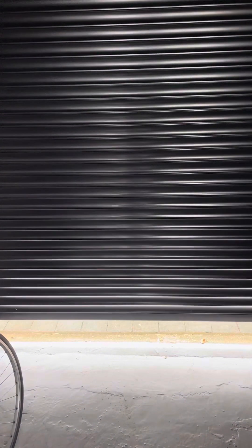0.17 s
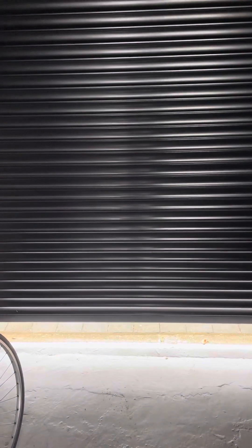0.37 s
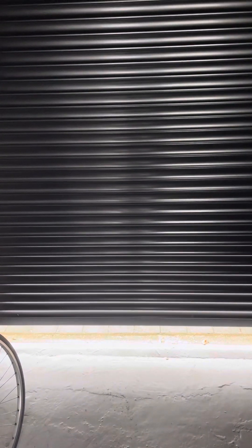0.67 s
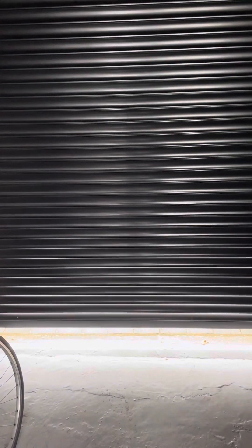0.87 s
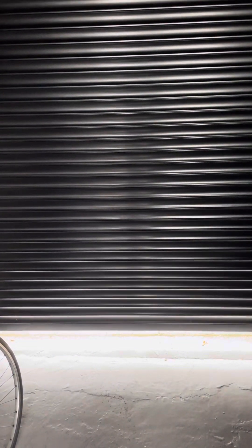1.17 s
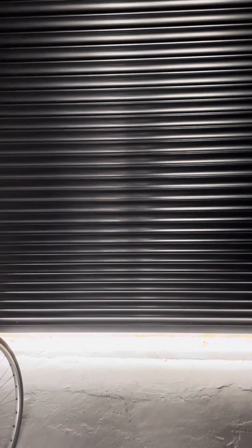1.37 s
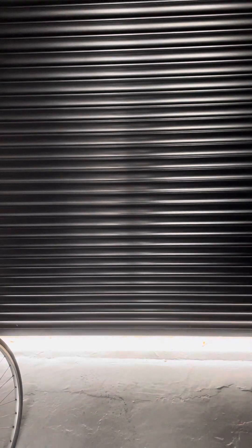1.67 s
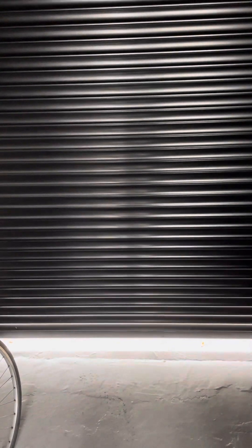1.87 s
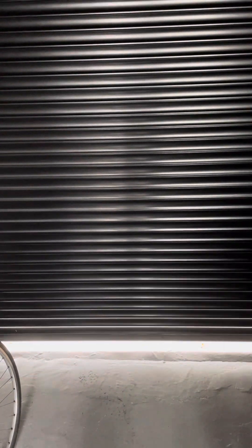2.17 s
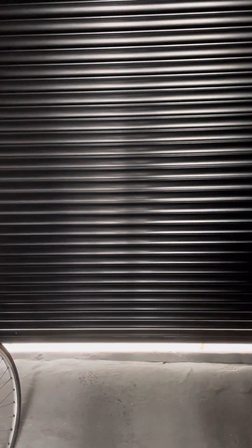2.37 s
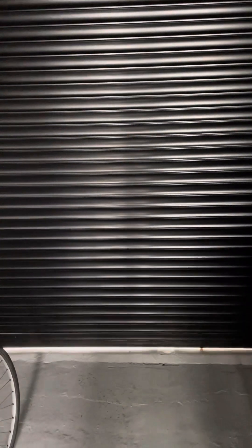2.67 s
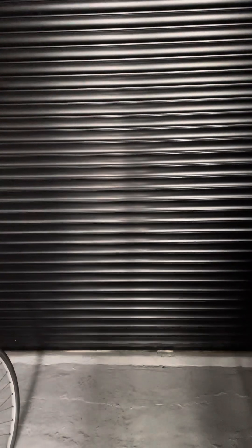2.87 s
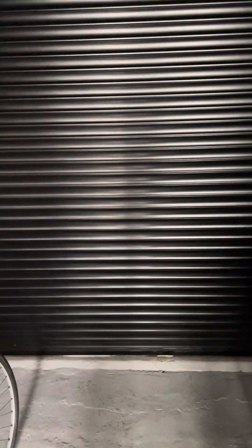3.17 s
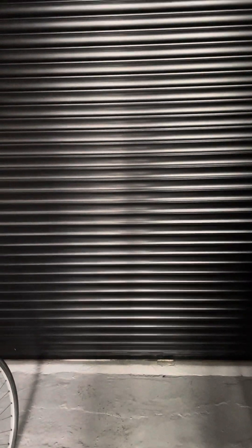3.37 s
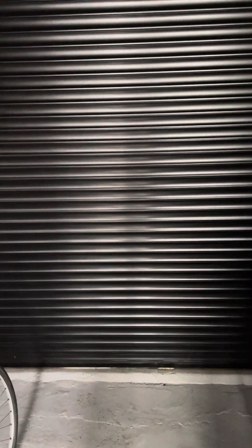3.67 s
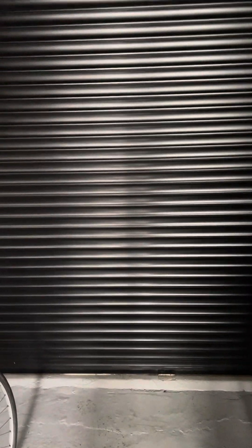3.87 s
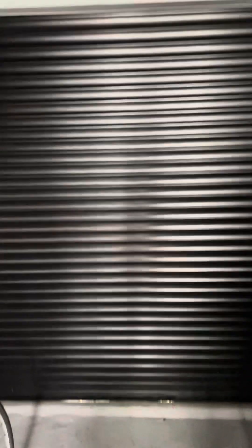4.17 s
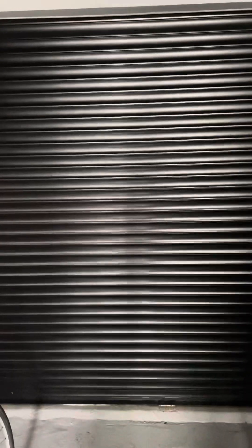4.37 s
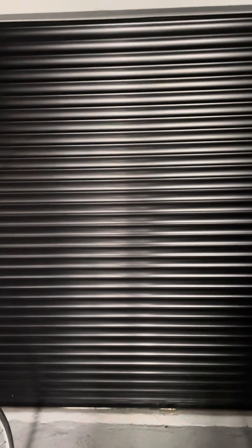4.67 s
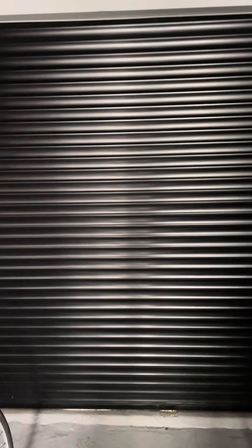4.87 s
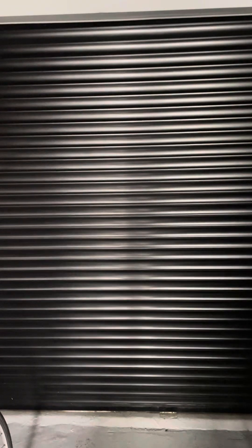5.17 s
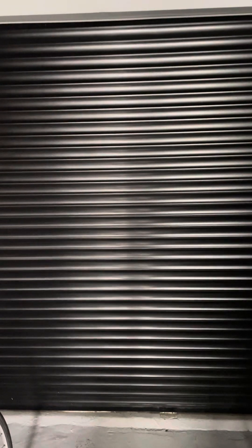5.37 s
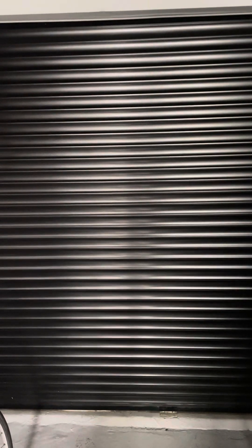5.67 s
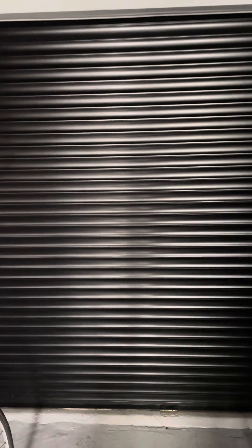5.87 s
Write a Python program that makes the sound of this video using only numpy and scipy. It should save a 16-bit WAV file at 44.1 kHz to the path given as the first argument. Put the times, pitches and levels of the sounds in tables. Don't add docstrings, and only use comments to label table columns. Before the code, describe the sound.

A motorised metal roller door closes in a bare concrete garage, heard a few steps away through a phone's stereo microphones. From 0 s the motor is already humming, a low mains drone with a mid-pitched gear whine, over the rumbling, rattling and hissing rub of the curtain. A strong jerk booms at about 0.7 s; a softer, longer boom comes at 1.5 s, with a sharp slat clack at 1.7. Clacks gather from 2.8 s, with fine hinge ticks, another jolt at 3.4 and loud clacks around 3.9 as the bottom lands. The gears slow slightly and their strained hum swells from 4 s, with fewer clacks. Near 5 s the curtain is pressed home with a deep hum surge, a clack and a tiny hoarse squeak. Slats clatter at 5.4, then at 5.66 the brake snaps with a hollow clunk; the sheet sways low and hum and short echo die away.

```python
import sys
import numpy as np
from scipy import signal
from scipy.fft import rfft, irfft, next_fast_len
from scipy.io import wavfile
from scipy.ndimage import uniform_filter1d

SR = 44100
rng = np.random.default_rng(int(sys.argv[2]) if len(sys.argv) > 2 else 0)


def boost(x):
    u = np.asarray(x, float) / 20
    return 10 ** u


def file_out(sig):
    cols = np.atleast_2d(sig).T
    lim = np.clip(cols, -1, 1)
    pcm = np.round(lim * 32767).astype(np.int16)
    wavfile.write(sys.argv[1], SR, pcm)


N = 265041
T = np.arange(N) / SR
BRAKE_S = 5.66


def curtain():
    # (time [s], shake level [dB], rubbing level [dB])
    travel = [(0, -52.5, -53), (.12, -48.5, -52), (.5, -48.5, -50), (1.2, -48.5, -52), (1.6, -46, -48.5),
              (2.2, -47.5, -52.5), (2.75, -44.5, -47.5), (3.1, -49.5, -51), (3.48, -44.5, -48.5),
              (3.9, -47, -53.5), (4.5, -52, -56), (4.88, -49, -55.5), (4.96, -44.5, -44), (5.12, -41, -46),
              (5.28, -53.5, -60), (5.45, -45, -49.5), (5.53, -52, -59), (5.65, -51, -54.5)]
    # (start [s], length [s], level [dB])
    jolts = [
        (.08, .09, -46.5),
        (.25, 0.2, -49),
        (.58, 0.075, -47.5),
        (.72, 0.14, -38),
        (1.5, 0.38, -48),
        (3.42, 0.19, -40),
        (4.0, .08, -46),
        (4.88, 0.21, -44),
        (5.65, 0.1, -39.5),
    ]
    # (frequency [Hz], width [Hz], level [dB])
    panel_modes = [(230.6, 10.5, -3), (268.8, 18, 0), (327.5, 20, 5), (363.6, 15, 6), (403.5, 14, -2.5),
                   (524.4, 23.4, -3.5), (588, 45, -2), (775, 47, 3.5), (816, 24, 0.5), (917, 60, -1.5),
                   (1059, 27.7, -2.5), (1176, 27, -6.5)]
    # (frequency [Hz], level [dB])
    thud_colour = [(25, -34), (45, -8), (72, -5), (90, -6), (140, -12), (170, -13.5)]
    rumble_colour = [(120, -35.5), (165, -4.5), (230, -0.5), (330, -5), (400, -5), (450, -4), (520, -3.5),
                     (620, -21), (750, -24)]
    rattle_colour = [(520, -21), (650, -1.5), (780, -4.5), (1050, -1), (1180, -7), (1450, -8.5),
                     (1900, -24.5)]
    rub_colour = [(1200, -13.5), (1600, -3.5), (2400, -2), (3300, -6.5), (4500, -9.5), (5100, -5.5),
                  (6300, -2.5), (8500, -5), (10000, -13.5), (12500, -5), (16000, -20.5)]
    rumble_db, thud_db, settle_db = -42, -55, -45
    quiet_db = -21.5
    settle_rise_s = 0.065

    shake_db, rub_db = columns(travel)
    swing_db = shake_db - np.mean(shake_db)
    boom_db = swells(jolts, rumble_db, 1.55)
    low = boost(stopped(0.85)) + boost(quiet_db)
    high = boost(stopped(0.47)) + boost(-39.5)

    push = unit(grains(3000, 0.34))
    modes = sum(boost(db) * ring(push, hz, width) for hz, width, db in panel_modes)
    sheet = push + boost(-9.5) * unit(modes)
    rumble_level = boost(boom_db + 0.6 * swing_db + 3.5 + 0.81 * walk(11))
    rumble = rumble_level * unit(colour(sheet, rumble_colour))
    rattle = boost(shake_db + 2.5 + 1.2 * walk(10)) * unit(colour(sheet, rattle_colour))
    rub = boost(rub_db + 4.5 + 1.36 * walk(8.2)) * unit(colour(grains(9000, 0.4), rub_colour))

    after = np.clip(T - BRAKE_S, 0, None) / settle_rise_s
    sway = boost(thud_db + 0.58 * (boom_db - rumble_db) + 0.42 * swing_db + 5.0)
    sway = sway + boost(settle_db) * after * np.exp(1 - after)
    thud = sway * unit(colour(push, thud_colour))
    return low * rumble + (low - 0.66 * boost(quiet_db)) * rattle + high * rub + thud


def grains(rate, scatter_db):
    hit = rng.random((2, N)) < rate / SR
    return hit * rng.standard_normal((2, N)) * boost(scatter_db * rng.exponential(size=(2, N)))


def clacks():
    # (time [s], peak level [dB], ring [Hz], low knock [dB], crack [dB])
    slat_hits = [(0.174, -40, 2230, -12, -11), (0.7804, -34, 2100, 12.5, -21),
                 (1.7125, -23.5, 1980, -3, -20), (2.2498, -40, 1970, 21, -13),
                 (2.8407, -22.5, 2080, 6.5, -23), (2.9173, -32.5, 2250, 19, -13),
                 (2.9905, -39.5, 2170, -5, -10), (3.085, -34.5, 2330, 8.5, -11.5),
                 (3.27, -39, 2350, 20, -19), (3.3579, -29.5, 2000, 2.5, -19), (3.4894, -40, 2170, 21, -22),
                 (3.7549, -28.5, 2280, 6.5, -14.5), (3.837, -37.5, 2320, 3, -21),
                 (3.8798, -24, 2200, 2, -17), (3.926, -21, 2210, -8, -21.5), (4.0405, -39, 2090, 18.5, -20),
                 (4.5228, -37.5, 1780, 13.5, -30), (4.9028, -37.5, 2320, 12.5, -14),
                 (5.03, -26, 2100, 8, -18), (5.35, -38.5, 2980, -9, -13), (5.4047, -29, 1870, -7, -26),
                 (5.4188, -25, 1980, -17.5, -23), (5.4373, -23.5, 1810, 1, -13.5)]
    # (time [s], peak level [dB])
    hinge_ticks = [
        (1.721, -71.5),
        (2.646, -79),
        (2.737, -49.5),
        (2.85, -52.5),
        (2.983, -53.5),
        (3.4514, -66),
        (3.508, -48),
        (3.592, -52),
        (4.4897, -72),
        (5.4331, -62.5),
    ]
    out, t = np.zeros(N), T[:SR // 5]
    for s, db, hz, knock_db, crack_db in slat_hits:
        chatter = rng.standard_normal(len(t)) * np.exp(-t / 0.02)
        slat = boost(6) * ring(chatter, hz, 550) + boost(crack_db + 12) * crack(chatter)
        knock = boost(knock_db - 0.5) * ring(chatter, 540, 700)
        lower_ring = boost(1.5) * ring(chatter, 0.61 * hz, 400)
        add(out, s, boost(db - 7.5) * (slat + knock + lower_ring))
    for s, db in hinge_ticks:
        tick = rng.standard_normal(len(t)) * np.exp(-t / 0.0025)
        add(out, s, boost(db + 26.0) * (ring(tick, 10000, 6400) + boost(-6) * ring(tick, 13500, 2500)))
    return out


def crack(x):
    return ring(ring(ring(x, 4800, 5400), 4000, 7800), 4200, 8000)


def brake():
    # (frequency [Hz], width [Hz], level [dB])
    housing = [(270, 130, -16), (676, 140, -9), (870, 100, -6.5), (1170, 62, -8), (1480, 1100, -7),
               (2530, 160, -6.5), (3400, 270, -23), (4840, 650, -12), (6500, 440, -20)]
    snap_db, clunk_db = -27.5, -27.5
    clunk_hz, clunk_rise_s = 366, 0.011
    t = T[:SR // 3]
    slap = rng.standard_normal(len(t)) * np.clip(t / 0.0063, 0, 1) * np.exp(-(t / 0.028) ** 2)
    snap = sum(boost(db) * ring(slap, hz, width) * np.sqrt(1000 / width) for hz, width, db in housing)
    swell = t / clunk_rise_s * np.exp(1 - t / clunk_rise_s)
    clunk = boost(clunk_db) * swell * np.sin(2 * np.pi * clunk_hz * t)
    return add(np.zeros(N), BRAKE_S, boost(snap_db + 2.5) * (snap + boost(-26) * crack(slap)) + clunk)


def squeak():
    centre_s, length_s, level_db = 5.02, 0.03, -49
    hoarse = unit(ring(rng.standard_normal(N), 2985, 90))
    return boost(level_db) * hoarse * np.exp(-((T - centre_s) / length_s) ** 2)


def motor():
    # (start [s], length [s], level [dB])
    tuned_100 = [(-.05, .8, -40), (1.1, 0.94, -41), (1.85, 0.43, -47.5), (2.2, 0.77, -37.5),
                 (2.85, 1.05, -41), (3.98, 0.36, -38.5), (4.45, 0.89, -35.5), (4.96, 0.26, -27.5),
                 (5.23, 0.32, -28.5), (5.5, .15, -44.5), (5.66, 0.22, -45)]
    tuned_200 = [
        (.05, 0.57, -48.5),
        (2.5, 0.23, -41),
        (3.97, 0.46, -36),
        (4.4, 0.71, -35.5),
        (4.85, .2, -33),
        (5.1, .33, -36.5),
        (5.48, 0.24, -38),
    ]
    tuned_300 = [
        (-.2, 2.04, -39),
        (1.9, 0.78, -42),
        (2.85, 1.07, -40),
        (3.97, 1.167, -35),
        (4.98, .17, -39),
        (5.45, .27, -37),
    ]
    tuned_mesh = [
        (-.1, .92, -40),
        (1.0, 1.0, -46.5),
        (2.85, .6, -45),
        (3.4, 0.99, -39.5),
        (4.3, 0.71, -46.5),
        (5.03, .2, -37),
        (5.24, 0.2, -37),
        (5.5, 0.15, -43.5),
    ]
    tuned_fifth = [
        (1.3, 0.38, -44),
        (2.05, 0.28, -47.5),
        (3.95, 0.62, -48.5),
        (4.85, 0.44, -39.5),
    ]
    tuned_panel = [(.05, 0.53, -47), (1.52, 0.42, -41),
                                                               (2.45, 0.5, -45), (3.5, .4, -42.5),
                                                               (4.3, 0.94, -51)]
    off_tune = [-54.5, -49, -46.5, -51.5, -49, -53]
    # (frequency [Hz], level [dB])
    shaft_lines = [(400, -52), (601, -56.5), (771, -71), (801, -71.5), (1292, -61.5), (1514, -68.5),
                   (2985, -70.5)]
    mains_hz = 50

    hum = line(2 * mains_hz, tuned_100, off_tune[0], 1.15, 0.7, 14, 0.2)
    hum = hum + line(4 * mains_hz, tuned_200, off_tune[1], 0.7, 2.1, 15, 0.51)
    hum = hum + line(6 * mains_hz, tuned_300, off_tune[2], 0.14, 1.77, 14, 0.46)

    mesh_hz = 489.7 - 2.3 * np.clip((T - 3.6) / 0.41, 0, 1)
    gears = line(mesh_hz, tuned_mesh, off_tune[3], 0.45, 1.2, 20, 0.35)
    gears = gears + line(10 * mains_hz, tuned_fifth, off_tune[4], 0.87, 1.7, 8.7, 0.46)
    gears = gears + line(351, tuned_panel, off_tune[5], 0.86, 3.9, 8.7, 0.75)

    running = np.clip((BRAKE_S + 0.03 - T) / 0.049, 0, 1)
    shaft = sum(tone(hz, db + 1.8 * walk(3.1), 1.76) for hz, db in shaft_lines)
    return (hum + gears) * boost(stopped(0.82)) + running * shaft


def line(hz, tuned, rest_db, round_top, drift_db, drift_hz, wobble):
    return tone(hz, swells(tuned, rest_db, round_top) + drift_db * walk(drift_hz), wobble)


def tone(hz, db, wobble):
    phase = 2 * np.pi * np.cumsum(hz + 0 * T) / SR + wobble * walk(6) + 2 * np.pi * rng.random()
    return boost(db) * np.sqrt(2) * np.sin(phase)


def garage(x):
    t60_s, treble_t60_s, room_db = 0.43, 0.31, -2
    t = T[:SR // 2]
    noise = rng.standard_normal((2, len(t)))
    low = signal.lfilter(*signal.butter(2, 1500, fs=SR), noise)
    tails = low * np.exp(-np.log(1000) * t / t60_s)
    tails = tails + (noise - low) * np.exp(-np.log(1000) * t / treble_t60_s)
    tails = tails * np.clip(t / 0.0044, 0, 1)
    wet = signal.fftconvolve(x[None], tails / np.sqrt(np.sum(tails[0] ** 2)), axes=1)[:, :N]
    return np.array([x + boost(room_db) * wet[0], boost(-0.5) * wet[1] + 0.32 * x])


def stopped(t60):
    return -60 * np.clip(T - BRAKE_S - 0.03, 0, None) / t60


def swells(rows, rest_db, round_top):
    t = T[::64]
    total = boost(rest_db)
    for s, length, db in rows:
        arch = np.sin(np.pi * np.clip((t - s) / length, 0, 1)).clip(0) ** round_top
        total = total + boost(db) * arch
    return np.interp(T, t, 20 * np.log10(total))


def columns(table):
    s, *cols = np.transpose(table)
    return [np.interp(T, s, c) for c in cols]


def walk(rate):
    k = int(SR / rate)
    steps = np.repeat(rng.standard_normal(N // k + 1), k)
    return unit(uniform_filter1d(uniform_filter1d(steps, k), k)[:N])


def unit(x):
    return x / np.sqrt(np.mean(x ** 2))


def ring(x, hz, width):
    return signal.lfilter(*signal.iirpeak(hz, hz / width, fs=SR), x)


def on_axis(x, hz, values):
    axis_hz = np.arange(x.shape[-1] // 2 + 1) * SR / x.shape[-1]
    return np.interp(np.log(axis_hz + 1), np.log(hz), values)


def colour(x, points):
    hz, db = np.transpose(points)
    hz = np.r_[hz[0] / 2, hz, 2 * hz[-1]]
    db = np.r_[db[0] - 40, db, db[-1] - 40]
    return irfft(rfft(x) * boost(on_axis(x, hz, db)), x.shape[-1])


def add(out, s, shape):
    i = int(s * SR)
    out[i:i + len(shape)] += shape[:N - i]
    return out


def scene():
    blows = garage(clacks() + squeak() + brake())
    return curtain() + blows + motor() * np.array([[1], [0.3]])


def top_cut(x):
    return signal.sosfilt(signal.butter(12, 15830, fs=SR, output="sos"), x)


def record(dry):
    # (frequency [Hz], sum [dB], difference [dB],
    # share of difference tied to the sum [0-1], its phase lead [rad])
    ports = [(60, 0, -30.5, 0.83, 3.0), (101, 0, -19.5, 0.84, 3.0), (160, -0.5, -19, 0.96, 3.0),
             (263, -1.5, -13, 1, 3.2), (433, 0.5, -2.5, 0.86, 2.28), (830, -1.5, -3.5, 0.5, 2.1),
             (1500, 2.5, 0.5, .3, 1.47), (4570, 0.5, -1.5, .3, 1.96), (5230, 1.5, -24, .3, 1.5),
             (5880, -3.5, -2.5, .3, 1.5), (6635, -8, -7, .3, 1.5), (7370, -39.5, -3.5, .3, 1.5),
             (8280, -25, -5.5, .3, 1.7), (10870, -16.5, -46, .3, 1.5), (14200, -32.5, -14.5, .3, 1.7),
             (16000, -7.5, -3, .3, 1.5)]
    dry = np.pad(dry, ((0, 0), (0, next_fast_len(N + 4096) - N)))
    hz, sum_db, difference_db, tied, lead = np.transpose(ports)
    tied = np.clip(on_axis(dry, hz, tied), 0, 1)
    field, other = rfft(dry)
    mid = irfft(field * boost(on_axis(dry, hz, sum_db)), dry.shape[1])[:N]
    across = tied * np.exp(1j * on_axis(dry, hz, lead)) * field + np.sqrt(1 - tied ** 2) * other
    side = irfft(across * boost(on_axis(dry, hz, difference_db)), dry.shape[1])[:N]
    top = signal.ellip(8, 0.2, 70, 15830, fs=SR, output="sos")
    return top_cut(signal.sosfilt(top, np.array([mid + side, mid - side])))


dry = scene()
out = record(dry)
file_out(out)
```